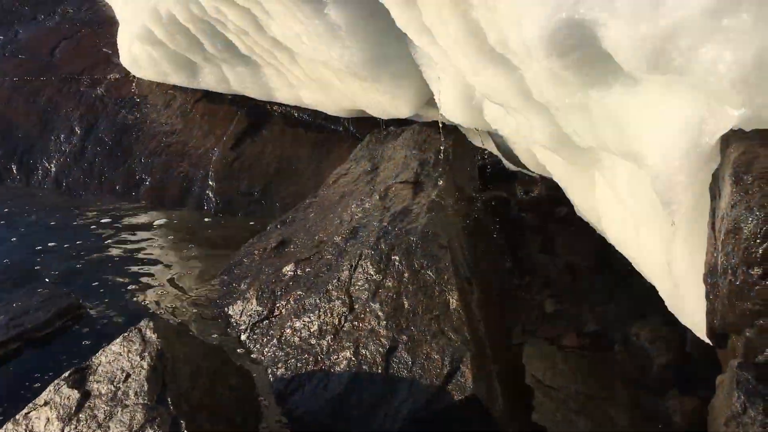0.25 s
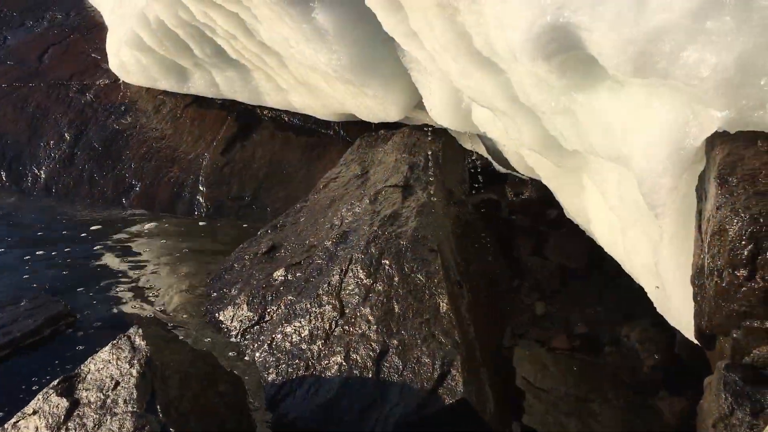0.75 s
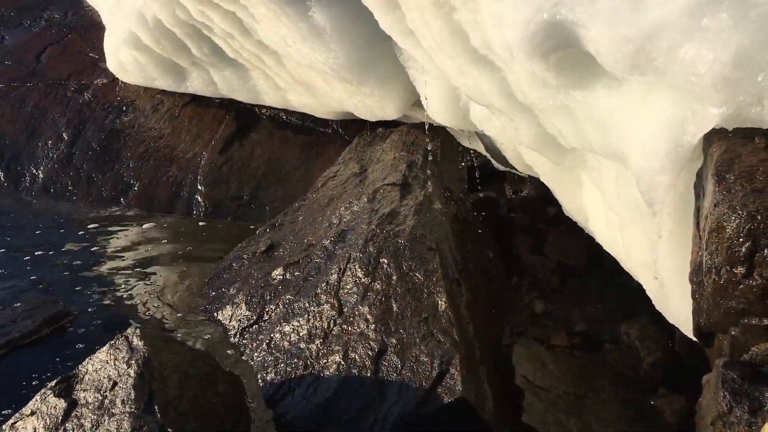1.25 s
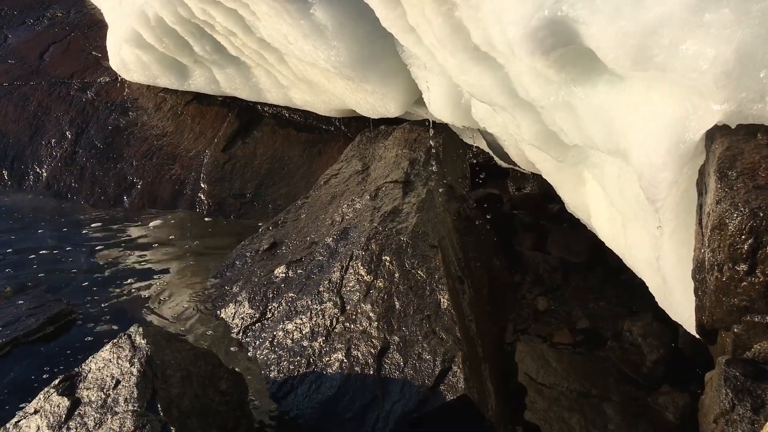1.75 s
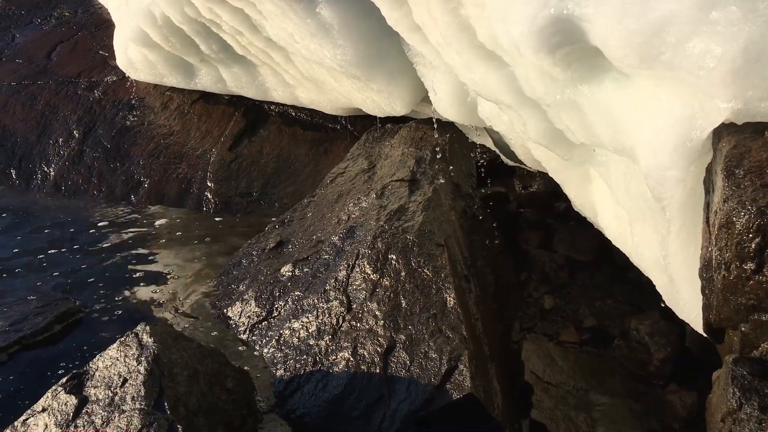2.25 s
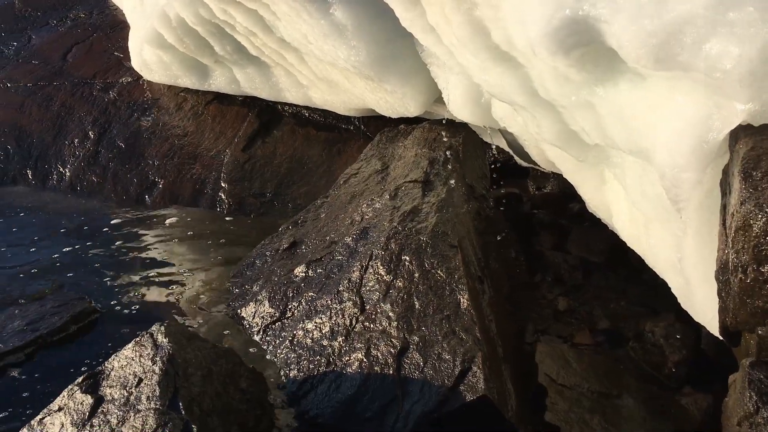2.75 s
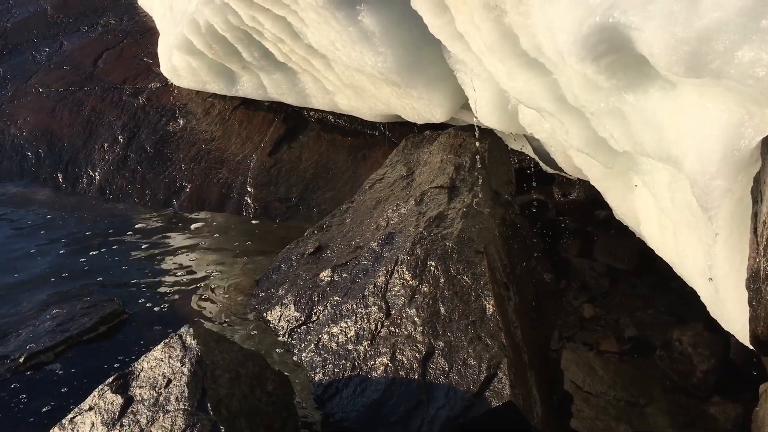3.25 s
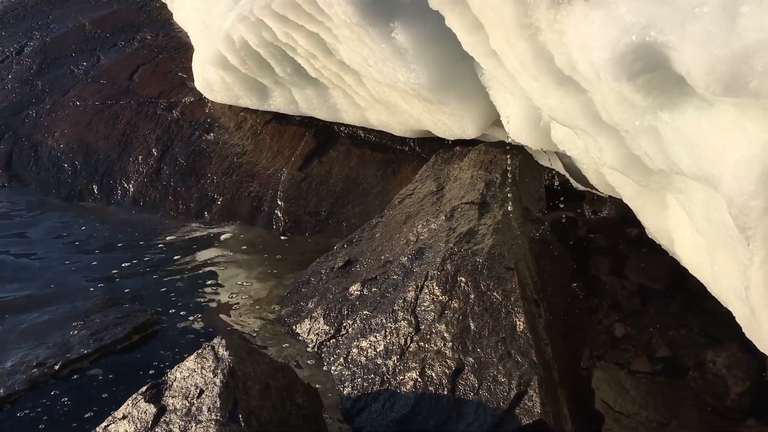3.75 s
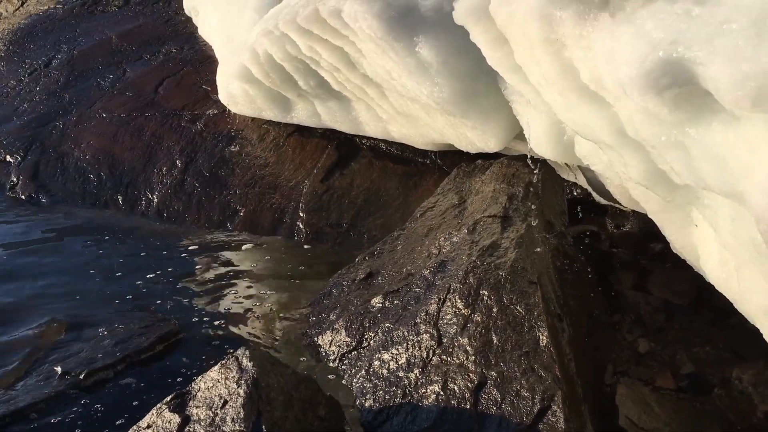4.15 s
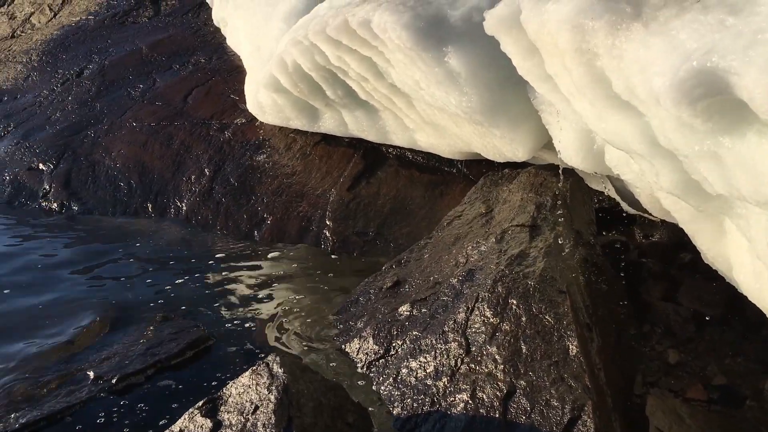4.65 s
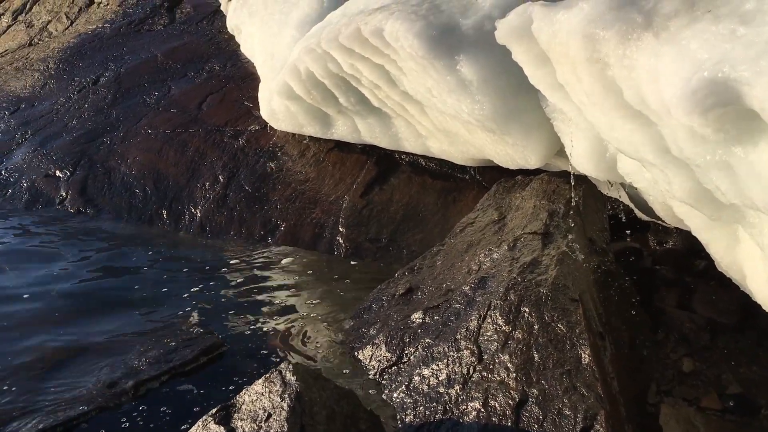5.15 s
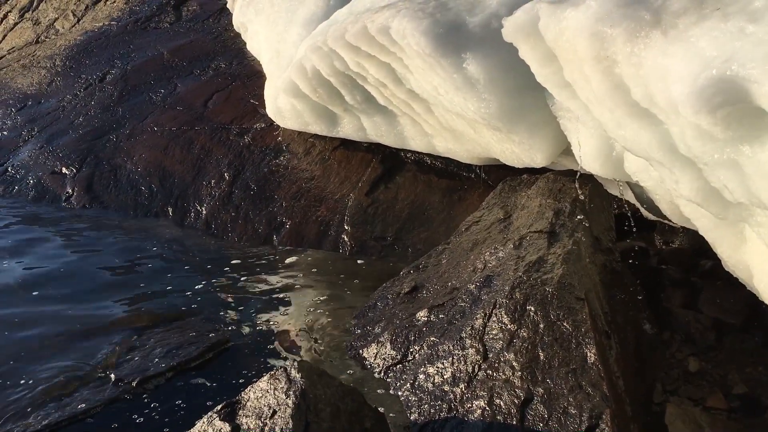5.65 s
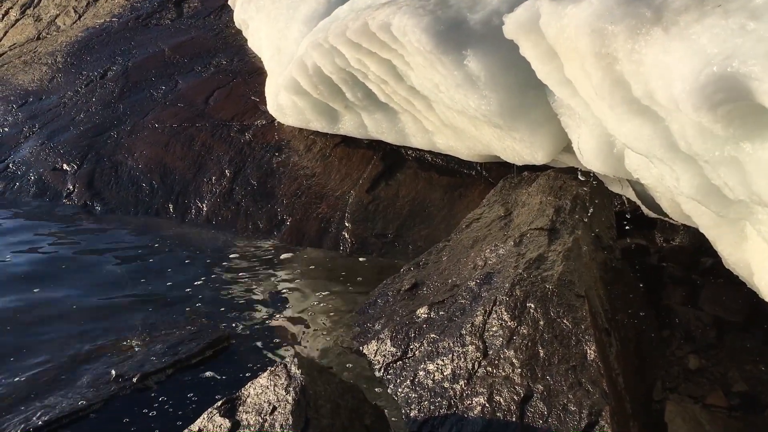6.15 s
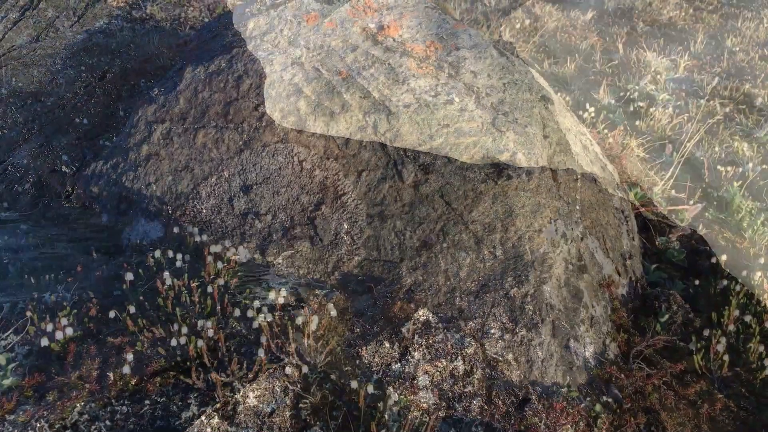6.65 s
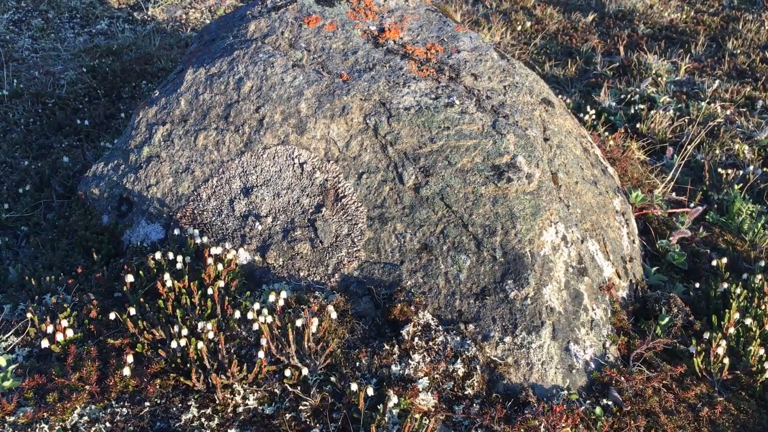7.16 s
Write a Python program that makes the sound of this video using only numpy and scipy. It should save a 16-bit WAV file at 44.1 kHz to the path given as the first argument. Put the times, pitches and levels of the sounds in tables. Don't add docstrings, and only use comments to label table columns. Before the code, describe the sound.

Outdoors on a rocky shore, meltwater drips fast and irregularly from ice, close to the microphone. Sharp bright ticks on stone mix with fine hissing patter, watery plinks and a few rounder plops. Far water washes faintly behind. Low wind thumps the microphone, strongest a little after two seconds. In the final second the drips fade into a much quieter shore.

```python
import sys
import numpy as np
from scipy import signal
from scipy.fft import rfft, irfft, next_fast_len
from scipy.io import wavfile
from scipy.ndimage import uniform_filter1d, map_coordinates

SR = 44100
rng = np.random.default_rng(int(sys.argv[2]) if len(sys.argv) > 2 else 0)


def gain_from_db(level_db):
    decades = np.asarray(level_db, float) / 20
    return 10 ** decades


def int16_out(signal):
    q = np.round(np.clip(np.atleast_2d(signal).T, -1, 1) * 32767)
    wavfile.write(sys.argv[1], SR, q.astype(np.int16))


N = 326781

# f/Hz, level/dB
WASH_COLOUR = [(100, -0.5), (200, -12), (320, 2), (480, -5.5), (620, -2.5), (750, -7), (1000, -3.5),
               (1700, -12), (2500, -17.5), (4000, -29), (8000, -59), (16000, -20)]
# f/Hz, level/dB
HUSH_COLOUR = [(90, -25), (150, -27), (300, -8), (470, -19.5), (900, -7.5), (1400, -9.5), (2800, -23.5),
               (5000, -39), (16500, -43)]
# t/s, share/0-1
LEAVING = [
    (0, 0.04),
    (6.0, 0.05),
    (6.45, 0.28),
    (7.15, 0.69),
    (7.41, 1),
]

# t/s, level/dB
STEADY_WIND = [(0.0, -39), (1.63, -38.5), (2.33, -30.5), (2.87, -37), (3.42, -38), (3.8, -39.5),
               (4.25, -36), (6.38, -38), (6.69, -42.5), (7.41, -48.5)]
# t/s, peak/dB
EDDIES = [(0.0, -25.5), (0.2, -29.5), (0.33, -30.5), (0.56, -28), (0.73, -32.5), (0.91, -33.5), (1.0, -34),
          (1.19, -30), (1.34, -30.5), (1.569, -35), (1.75, -29.5), (1.93, -34), (2.08, -29.5),
          (2.23, -23.5), (2.33, -18.5), (2.47, -23.5), (2.62, -35), (2.951, -29), (3.11, -27.5),
          (3.261, -23.5), (3.42, -26.5), (3.51, -27.5), (3.94, -33), (4.33, -26.5), (4.499, -23.5),
          (4.65, -30), (4.85, -33), (5.16, -21.5), (5.32, -32), (5.47, -30), (5.58, -32), (5.7, -25.5),
          (5.8, -23), (6.1, -27), (6.2, -29), (6.32, -27), (6.38, -32), (7.37, -34.5)]
# t/s, peak/dB, f/Hz
POPS = [(0.042, -26, 292), (0.26, -30, 148), (1.341, -30, 160), (1.55, -28, 130), (2.144, -20.5, 156),
        (2.195, -21, 151), (2.209, -19, 130), (2.293, -15.5, 174), (2.322, -22, 220), (2.349, -18.5, 307),
        (2.379, -22, 231), (2.414, -19.5, 140), (2.509, -29, 168.6), (2.53, -25.5, 170), (2.59, -25, 230),
        (3.147, -31, 141.4), (3.383, -29, 140), (3.721, -28.5, 138), (3.802, -31.5, 150), (4.528, -39, 308),
        (5.813, -17, 139.4)]
# f/Hz, level/dB
RUMBLE_COLOUR = [(12, -44), (20, -16), (47, -1), (65, 0.5), (99, -5.5), (200, -29.5), (260, -104),
                 (440, -120)]
# f/Hz, level/dB
EDGE_COLOUR = [(80, -25), (130, 5.5), (250, -7.5), (450, -19.5), (900, -58)]

# t/s, peak/dB, bubble f/Hz
STRAY_DROPS = [(0.2783, -38, 2820), (4.513, -40, 3100), (1.6038, -45, 3250), (3.4515, -38, 4200),
               (3.4785, -41, 4200), (5.22, -38, 4270), (5.4354, -39, 4100), (6.2175, -43, 4300),
               (6.236, -43, 4100), (6.8294, -47, 3900),
               (0.3894, -37.5, 7300), (0.578, -31, 6000), (2.8844, -44, 6070), (3.2296, -35, 6100),
         (4.0054, -32, 7060), (4.04, -35, 6460), (4.3414, -41, 6540), (4.3585, -35, 6470),
         (4.774, -37, 5600), (5.2185, -39, 6540), (6.536, -45, 8500), (6.5894, -39, 5570),
         (6.6724, -47, 5350)]

# f/Hz, time to fall 60 dB/s
HOLLOW_T60 = [
    (1500, 0.055),
    (5000, 0.073),
    (15000, 0.06),
]

# t/s, level/dB
FLOW = [(0.0, -43), (1.07, -42.5), (1.46, -44), (2.35, -42), (2.58, -46), (2.77, -41.5), (3.1, -44.5),
        (3.61, -39.5), (4.29, -44.5), (4.62, -40.5), (5.3, -42), (6.15, -44.5), (6.52, -44.5), (6.91, -56),
        (7.06, -59.5), (7.14, -69.5), (7.41, -79)]
# f/Hz, level/dB
DROP_COLOUR = [(1200, -66), (2500, -6), (4000, -10.5), (5100, -13), (6200, -8.5), (7600, -10), (9500, -5),
               (10400, -9), (11200, -5), (16500, -4.5)]
# t/s, peak/dB, loudest f/Hz
WET_SHELF = [(0.3604, -35.5, 6030), (0.4723, -36.5, 6400), (0.519, -32, 6730), (0.5464, -35, 6060),
             (0.9333, -38, 6090), (1.3747, -39, 6200), (1.481, -32, 7340), (2.119, -32.5, 6900),
             (2.147, -34, 5600), (2.288, -31, 6240), (2.5633, -41, 6290), (2.5834, -37, 6640),
             (2.811, -37, 5700), (2.989, -28, 6660), (3.0939, -38.5, 6440), (3.3807, -38, 6060),
             (3.421, -33.5, 7110), (3.5011, -30, 5760), (3.8574, -35.5, 6050), (3.934, -36.5, 6480),
             (4.227, -34.5, 6260), (4.6245, -30, 6100), (4.995, -34.5, 5900), (5.0463, -41, 6560),
             (5.5474, -36.5, 6125), (5.683, -33, 6210), (5.9892, -28, 5770), (6.0655, -36, 6360),
             (6.098, -33.5, 6020), (6.1722, -33.5, 5950)]
# t/s, peak/dB, loudest f/Hz
SLOPE = [(0.118, -24, 7900), (0.3148, -21, 9100), (0.4723, -21, 8860), (0.5186, -21, 8680),
         (0.7715, -24.5, 9370), (1.1107, -26.5, 9400), (1.4803, -24.5, 8600), (1.9052, -23.5, 8700),
         (2.0425, -29.5, 7450), (2.583, -26, 9250), (2.8082, -30, 9900), (2.8622, -29, 9230),
         (2.9891, -34.5, 7470), (3.261, -22, 9440), (3.4206, -22, 7800), (3.494, -29, 9330),
         (3.7397, -24, 9300), (3.8075, -29.5, 8620), (3.8294, -31, 8960), (4.2272, -28, 9770),
         (4.3076, -29, 9270), (4.4695, -28.5, 8520), (4.8613, -25, 9800), (4.921, -46, 8970),
         (5.1826, -30.5, 9240), (5.5772, -26, 9680), (5.682, -32, 8910), (5.712, -27, 9900),
         (5.908, -28.5, 7970), (5.9885, -37, 8820), (6.0668, -30.5, 9650), (6.6172, -28, 7600)]
# t/s, peak/dB, loudest f/Hz
BARE_ROCK = [(0.472, -22, 14200), (0.5186, -20, 14700), (0.5597, -26, 13150), (1.3076, -23.5, 14200),
             (1.801, -19.5, 15000), (1.923, -19, 12840), (2.1761, -21.5, 11120), (2.489, -24, 13000),
             (2.8075, -24, 12130), (2.8342, -20, 12500), (2.989, -34, 15400), (3.2308, -21, 14170),
             (3.26, -23.5, 12120), (3.3092, -20.5, 12000), (3.6222, -31, 13530), (3.6552, -20, 11200),
             (3.693, -22, 11400), (3.9337, -21, 13500), (3.9931, -19, 12210), (4.7652, -21, 14040),
             (4.8627, -24.5, 11490), (5.3186, -29.5, 12200), (5.576, -29, 15000), (5.683, -28.5, 12550),
             (5.7936, -25, 15300), (5.906, -20, 12550), (6.2191, -27.5, 14720), (6.2342, -28.5, 14000),
             (6.4104, -20, 13300), (6.6566, -27.5, 14100)]
# t/s, peak/dB, loudest f/Hz
FAR_EDGE = [(0.182, -28.5, 13000), (0.202, -23.5, 13100), (0.2749, -26, 14400), (0.6343, -27.5, 13800),
            (0.6728, -27.5, 14500), (0.7964, -27.5, 14000), (0.856, -27, 13340), (0.9103, -32, 12800),
            (0.964, -32, 11260), (1.0253, -32, 12100), (1.1412, -30, 13600), (1.2603, -26.5, 12800),
            (1.8521, -33, 11700), (2.0766, -24.5, 15500), (2.4248, -34.5, 12960), (2.4443, -29, 14400),
            (2.6459, -30, 13400), (2.8952, -31, 13900), (3.018, -29.5, 13600), (3.1227, -27.5, 11750),
            (3.5439, -25, 13370), (4.0398, -25.5, 12400), (4.3296, -33, 11950), (4.4219, -29.5, 12900),
            (4.59, -27, 15130), (4.6034, -23.5, 12000), (5.2752, -33, 13500), (5.7752, -31, 11300),
            (6.1489, -25, 14800), (6.5925, -26.5, 14430)]
# t/s, peak/dB, loudest f/Hz
NEAR_EDGE = [(1.203, -32, 5860), (1.215, -26.5, 8640), (1.8171, -30.5, 6480), (1.872, -27, 9300),
             (2.3265, -38, 6800), (2.382, -28.5, 8750), (2.395, -28, 9650), (2.931, -29.5, 8760),
             (3.039, -28.5, 8400), (3.1692, -30, 6800), (3.201, -31.5, 7700), (3.294, -26.5, 9150),
             (3.335, -31.5, 7800), (3.4498, -28.5, 8760), (3.6411, -30.5, 6700), (3.7161, -31, 8760),
             (3.9466, -27, 10000), (4.07, -29, 5370), (4.4985, -27, 5500), (4.539, -31.5, 6220),
             (4.766, -29, 5680), (4.812, -32.5, 7250), (5.1395, -34.5, 6480), (5.218, -33.5, 8570),
             (5.234, -32, 8900), (5.2749, -38, 7100), (5.49, -28.5, 5850), (5.754, -29, 8500),
             (6.4294, -37, 9300), (6.8292, -36, 6200)]
# t/s, peak/dB, loudest f/Hz
SEEP = [(0.0284, -38, 7620), (0.217, -32, 6100), (0.242, -34, 5560), (0.3745, -34.5, 6180),
        (0.669, -36, 6670), (1.0484, -44, 6460), (1.497, -28, 5940), (1.549, -37, 6070),
        (1.7117, -31.5, 8070), (1.7236, -29, 7360), (1.9114, -25, 7600), (2.2326, -35, 6510),
        (2.51, -29.5, 7060), (2.659, -32, 6640), (2.947, -28.5, 6320), (3.154, -25.5, 6620),
        (3.3206, -29, 7060), (3.3584, -28.5, 5960), (3.4623, -30, 6970), (3.627, -34.5, 6630),
        (3.6727, -31, 6410), (3.9163, -34, 3480), (3.9598, -34, 6180), (4.148, -30, 6500),
        (4.276, -33.5, 5900), (4.3923, -32, 6600), (4.4771, -22.5, 4690), (4.6804, -32.5, 5940),
        (4.7753, -25, 6480), (4.8196, -29, 7170), (4.8515, -31.5, 5860), (4.8936, -36.5, 6180),
        (4.9334, -30, 5100), (5.057, -29, 4700), (5.069, -32, 7200), (5.0788, -28.5, 7000),
        (5.1138, -32.5, 3620), (5.1933, -33.5, 6470), (5.3131, -37, 6240), (5.3842, -32.5, 7480),
        (5.4027, -28.5, 6980), (5.502, -23.5, 7270), (5.5402, -33.5, 4040), (5.5902, -22, 5950),
        (5.6388, -40, 6600), (5.808, -26.5, 6600), (5.9291, -30.5, 6100), (5.9496, -31, 4280),
        (6.115, -34.5, 6340), (6.2719, -30, 5230), (6.5569, -35, 4480), (6.6456, -41, 6760),
        (6.779, -43.5, 4330), (6.8217, -40, 6400), (6.84, -41.5, 3770), (6.8924, -40, 6010),
        (6.922, -42, 6350), (7.007, -45.5, 5660), (7.069, -48, 3880), (7.0959, -53, 3680)]
# t/s, peak/dB, loudest f/Hz
FRINGE = [(0.037, -36.5, 9110), (0.2939, -25, 13670), (0.4221, -29, 14000), (0.4865, -33.5, 14530),
          (0.6991, -30, 8700), (0.7608, -31, 12060), (0.9902, -31.5, 10820), (1.089, -25.5, 11280),
          (1.287, -33, 11410), (1.3327, -26, 11410), (1.417, -27.5, 13850), (1.4409, -33.5, 9320),
          (1.4696, -29, 9900), (1.5055, -30, 8900), (1.6031, -29, 9910), (1.702, -35, 11200),
          (2.0499, -27, 7860), (2.2999, -30, 9400), (2.4172, -29.5, 14990), (2.4742, -38.5, 13390),
          (2.8526, -27.5, 8900), (2.9572, -22.5, 13600), (3.069, -37, 11550), (3.4772, -31.5, 9190),
          (3.5626, -32, 9190), (3.5923, -31, 8870), (3.7269, -26.5, 8930), (3.765, -33.5, 13650),
          (3.7731, -33, 13740), (3.8722, -29, 11580), (4.0195, -28, 8800), (4.1195, -29.5, 14050),
          (4.1585, -29.5, 14080), (4.3458, -33, 11480), (4.4001, -27.5, 12640), (4.572, -29, 9100),
          (4.644, -24, 11850), (4.692, -26.5, 12020), (4.702, -34.5, 13950), (4.7142, -34.5, 13980),
          (4.7918, -29.5, 13520), (4.842, -29.5, 13000), (4.9822, -30, 14450), (4.9904, -31.5, 13500),
          (5.0386, -39.5, 15120), (5.0876, -28.5, 12470), (5.344, -37, 9330), (5.728, -30, 9260),
          (5.8397, -32, 8700), (6.021, -35, 14620), (6.0845, -29.5, 13880), (6.3165, -35, 9300),
          (6.7093, -39.5, 11280), (6.8034, -47, 9500), (6.815, -34, 12360), (6.917, -46, 12340),
          (6.945, -51.5, 11650), (6.9765, -49, 12170), (6.99, -38, 9750), (7.0812, -49.5, 13850)]
LANDING_DB = [
    10.6,
    2.31,
    0.2,
    2.3,
    4.88,
    1.3,
    0.8,
]
# t/s, peak/dB, bubble f/Hz
PUDDLE = [(0.3586, -37, 3640), (1.1932, -35, 2170), (1.433, -32.5, 3420), (2.2214, -36.5, 3670),
          (2.3066, -30.5, 3580), (2.359, -29.5, 3200), (3.5553, -29, 3220), (3.7412, -29, 3520),
          (4.0297, -26.5, 3320), (4.2275, -26, 3790), (4.357, -33, 3520), (4.545, -28, 3030),
          (5.5967, -31, 2850), (5.6825, -29.5, 3650), (5.7122, -27, 3180), (6.0132, -28.5, 3720)]
# t/s, peak/dB, bubble f/Hz
FILM = [(0.086, -35.5, 4020), (0.276, -32, 4500), (0.405, -30, 5360), (0.544, -40, 4620),
        (0.574, -36, 4400), (0.7368, -32, 3650), (0.9333, -28.5, 4270), (1.311, -32, 4430),
        (3.1206, -33.5, 4490), (3.443, -28.5, 4040), (3.5229, -25, 4200), (3.8668, -31.5, 4540),
        (3.9997, -32.5, 4350), (4.072, -27, 3910), (4.2068, -34, 3800), (4.4666, -33, 4560),
        (4.4993, -31.5, 3700), (4.6253, -28.5, 4800), (4.7843, -36, 4500), (4.9488, -30, 4530),
        (4.997, -38, 4200), (5.3927, -31.5, 4520), (5.547, -27, 4100), (5.577, -32, 3870),
        (5.989, -28, 4420), (6.097, -30, 5100), (6.3245, -36.5, 3760), (6.4587, -35, 4900),
        (6.671, -44, 3010), (6.708, -43.5, 2620)]
# t/s, peak/dB, f/Hz, time to fall 60 dB/s, pitch climb over its life/share
PLOPS = [(0.7378, -29.5, 2380, 0.03, 0.14), (1.392, -40, 3360, 0.039, 0.045),
         (1.605, -47, 2840, 0.08, 0.01), (3.145, -35.5, 1397, 0.1, 0.013), (3.532, -32.5, 2217, 0.06, 0.36),
         (3.917, -43.5, 3430, 0.1, -0.16), (4.312, -42, 1646, 0.084, -0.06),
         (4.7142, -37, 2500, 0.068, -0.24), (5.113, -33, 1610, 0.08, 0.088),
         (6.2823, -36, 1550, 0.089, 0.03), (6.3725, -27.5, 2135, 0.047, 0.03)]


def unit(x):
    return x / np.sqrt(np.mean(x ** 2) + 1e-20)


def along(points, hz):
    f, v = np.transpose(points)
    return np.interp(np.log(hz + 1), np.log(f + 1), v)


def curves(rows):
    s, *cols = np.transpose(rows)
    return [np.interp(np.arange(N) / SR, s, c) for c in cols]


def wobble(rate):
    knots = rng.standard_normal(int(N * rate / SR) + 4)
    return map_coordinates(knots, [np.arange(N) * rate / SR])


def filtered(x, response):
    m = next_fast_len(N + 8192)
    return irfft(rfft(x, m) * response(np.fft.rfftfreq(m, 1 / SR)), m)[..., :N]


def rush(spectrum):
    return unit(filtered(rng.standard_normal(N), lambda hz: gain_from_db(along(spectrum, hz))))


def placed(s, grains):
    at = np.round(s * SR).astype(int)[:, None] + np.arange(grains.shape[1])
    return np.bincount(at.ravel(), grains.ravel(), N + SR)[:N]


def slaps(s, db, hz, t60, octaves, wide_db, size):
    t = np.arange(size) / SR
    apart = np.log2((np.fft.rfftfreq(size, 1 / SR) + 1) / hz[:, None])
    skirt = gain_from_db(wide_db + 10.0 * np.minimum(apart, 0))
    colour = np.exp(-(apart / octaves) ** 2) + skirt
    life = t / t60[:, None]
    noise = irfft(rfft(rng.standard_normal((len(s), size))) * colour, size)
    puff = noise * (1 - np.exp(-life / 0.038)) * gain_from_db(-60 * life)
    return placed(s, gain_from_db(db[:, None]) * puff / np.abs(puff).max(axis=1, keepdims=True))


def bubbles(s, db, hz, t60, rise, shaky, swell_s=0.0001):
    t = np.arange(SR // 12) / SR
    life = t / t60[:, None]
    drift = np.cumsum(rng.standard_normal(life.shape), axis=1) * shaky * hz[:, None] / SR
    phase = 2 * np.pi * hz[:, None] * t * (1 + rise * (life - 0.2)) + drift
    return placed(s, gain_from_db(db[:, None] - 60 * life) * (1 - np.exp(-t / swell_s)) * np.sin(phase))


def wash():
    wash_db, hush_db = -41.5, -52
    echo_s = 0.003314

    def off_rock(hz):
        return 1 + 0.18 * np.exp(-2j * np.pi * hz * echo_s) / (1 + 1j * hz / 1800)

    share = np.clip(curves(LEAVING)[0], 0, 1)
    water = (1 - share) ** 1.7 * gain_from_db(wash_db) * unit(filtered(rush(WASH_COLOUR), off_rock))
    shore = np.sqrt(share) * gain_from_db(hush_db) * rush(HUSH_COLOUR)
    return gain_from_db(1.04 * wobble(6)) * (water + shore)


def buffeting():
    eddy_s, growth_per_db, flutter_db = 0.014, 0.02, 1
    t = np.arange(N) / SR
    power = gain_from_db(curves(STEADY_WIND)[0] + 2.0 + flutter_db * wobble(14)) ** 2
    for s, db in EDDIES:
        half_s = eddy_s * (1.5 + growth_per_db * (db + 16.0))
        power = power + gain_from_db(db) ** 2 * np.exp(-((t - s) / half_s) ** 2)
    return 10 * np.log10(power)


def wind():
    port_top = 0.24
    buffet_db = buffeting()
    rumble = rush(RUMBLE_COLOUR)
    swell = np.sqrt(np.abs(uniform_filter1d(rumble ** 2, SR // 30)) + 0.05)
    thumps = gain_from_db(buffet_db) * unit(rumble / swell ** 0.6)
    gust_db = uniform_filter1d(buffet_db, SR // 8) + 27.0
    edge = gain_from_db(-40.5 + 0.88 * gust_db) * rush(EDGE_COLOUR)
    s, db, hz = np.transpose(POPS)
    turns = np.arange(SR // 25) / SR * hz[:, None]
    fall = gain_from_db(db[:, None] + 9.5 - 15.3 * turns)
    pops = -fall * (1 - np.exp(-turns / 0.32)) * np.sin(2 * np.pi * turns)
    push = thumps + edge + placed(s, pops)
    return push / (1 + np.abs(push / port_top) ** 4) ** (1 / 4)


def hollow(x):
    out, size = np.zeros(N + SR), SR // 40
    for start in range(0, N, size):
        hz, t, z = signal.stft(rng.standard_normal(SR // 8), SR, nperseg=128)
        fade = gain_from_db(-60 * t / along(HOLLOW_T60, hz)[:, None])
        tail = signal.istft(z * fade, SR, nperseg=128)[1]
        wet = signal.fftconvolve(x[start:start + size], tail / np.linalg.norm(tail))
        out[start + 60:][:len(wet)] += wet
    return out[:N]


def stragglers():
    s, db, hz = np.array(STRAY_DROPS).T
    t60 = 0.028 * (4000 / hz) ** 1.0
    splash = slaps(s, db + 3, hz, 0.56 * t60, octaves=0.15, wide_db=-25, size=1024)
    return splash + gain_from_db(-6.5) * bubbles(s, db, hz, t60, rise=0.045, shaky=1.9)


def patter(busy, count):
    scattered = 2.2
    when, big, pitch, life = rng.random((count, 4)).T
    crowding = scattered + np.abs(busy) / np.abs(busy).mean()
    arrived = np.cumsum(gain_from_db(2.2 * wobble(25)) * crowding)
    s = np.interp(when, arrived / arrived[-1], np.arange(N) / SR)
    size_db = np.minimum(-4.6 * np.log(1 - big), 13)
    hz, t60 = 4500 * 3.4 ** pitch, 0.00075 + 0.029 * life
    return unit(slaps(s, size_db, hz, t60, octaves=0.5, wide_db=-13, size=512))


def stone_drops():
    rebound_s = 0.008
    tick_db, tick_t60 = 3.5, 0.0036
    mist_db = -4
    flow_db, = curves(FLOW)
    places = [WET_SHELF, SLOPE, BARE_ROCK, FAR_EDGE, NEAR_EDGE, SEEP, FRINGE]
    lifted = [np.add(rows, [0.0006, lift, 0]) for rows, lift in zip(places, LANDING_DB)]
    s, db, hz = np.vstack(lifted).T
    life = 0.011 * (8000 / hz) ** 2.0 * gain_from_db(0.7 * rng.standard_normal(len(s)))

    hits = placed(s, gain_from_db(0.3 * (db - flow_db[(s * SR).astype(int)]))[:, None])
    busy = filtered(hits, lambda f: 1 / (1 + 2j * np.pi * f * rebound_s))
    mist = gain_from_db(mist_db) * filtered(rng.standard_normal(N), lambda f: f / (f + 9000j))
    fine = gain_from_db(flow_db + 2.5) * (patter(busy, count=3800) + mist)

    octaves = 0.16 * (hz[:, None] / 6000) ** 1.6
    single = gain_from_db(1.5) * slaps(s, db, hz, life, octaves=octaves, wide_db=-20.5, size=1024)
    tick = slaps(s, db + tick_db, hz, np.full(len(s), tick_t60), octaves=0.49, wide_db=-3, size=256)
    return filtered(single + tick + fine, lambda f: gain_from_db(along(DROP_COLOUR, f)))


def plinks():
    puddle_t60, film_t60, spread_db = 0.035, 0.026, 2.5
    s, db, hz = np.vstack([PUDDLE, FILM]).T
    usual_t60 = np.repeat([puddle_t60, film_t60], [len(PUDDLE), len(FILM)])
    t60 = usual_t60 * gain_from_db(spread_db * rng.standard_normal(len(s)))
    entry = slaps(s, db + 0.49, 1.09 * hz, 0.89 * t60, octaves=0.59, wide_db=-2, size=1024)
    return entry + gain_from_db(-3.5) * bubbles(s, db, hz, 0.8 * t60, rise=0.072, shaky=3.8)


def plops():
    s, db, hz, t60, climb = np.transpose(PLOPS)
    froth_db = db - 1 + 0.7 * (db + 28)
    froth = slaps(s, froth_db, 1.08 * hz, 0.9 * t60, octaves=0.28, wide_db=-13, size=2048)
    return froth + bubbles(s, db + 3, hz, t60, rise=climb[:, None], shaky=1.5, swell_s=0.002)


def drips():
    return stone_drops() + plinks() + plops()


def scene():
    water = drips()
    return (water + gain_from_db(-8.5) * hollow(water) + wash() + wind() + stragglers())[None]


def gain_control(x):
    threshold_db, db_per_db_over, duck_s = -29.5, 0.088, 0.57
    loud_db = 10 * np.log10(np.abs(uniform_filter1d(x ** 2, int(duck_s * SR))) + 1e-12)
    return x * gain_from_db(-db_per_db_over * np.maximum(loud_db - threshold_db, 0))


def band_limit(x):
    return signal.sosfilt(signal.butter(12, 16830, fs=SR, output="sos"), x)


def record(dry):
    dip_hz, dip_wide_hz, dip_db = 4920, 350, -1.5
    top_hz, above_top_db, bass_hz = 15750, -48, 30

    def microphone(hz):
        dip = gain_from_db(dip_db * np.exp(-((hz - dip_hz) / dip_wide_hz) ** 2))
        top = np.where(hz < top_hz, 1, gain_from_db(above_top_db))
        return dip * top / (1 + (bass_hz / (hz + 1)) ** 3)

    mix = filtered(gain_control(dry), microphone)
    return band_limit(mix)


dry = scene()
out = record(dry)
int16_out(out)
```